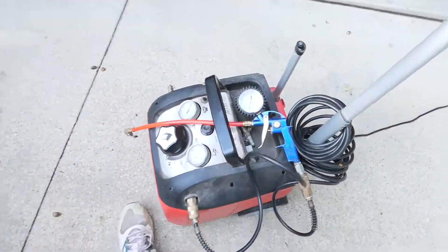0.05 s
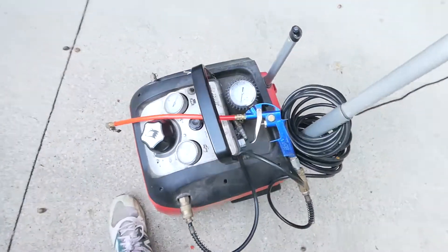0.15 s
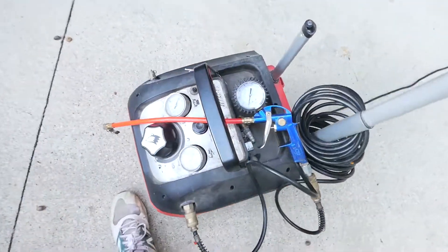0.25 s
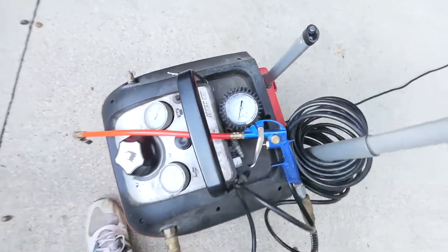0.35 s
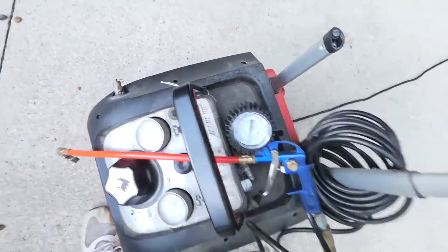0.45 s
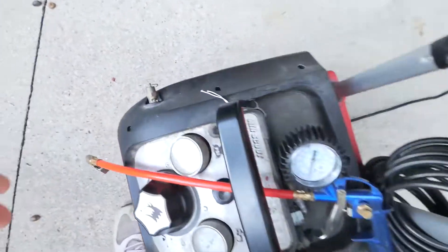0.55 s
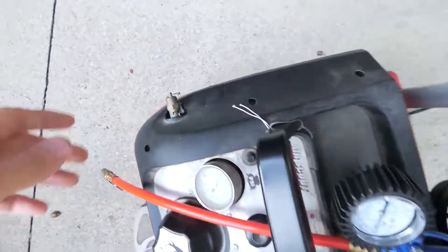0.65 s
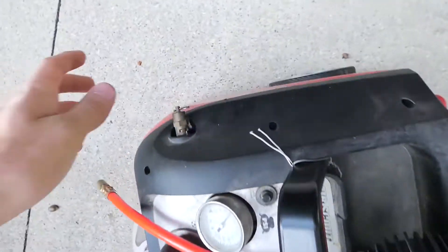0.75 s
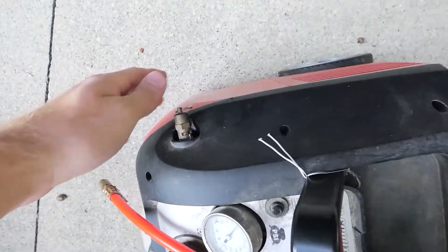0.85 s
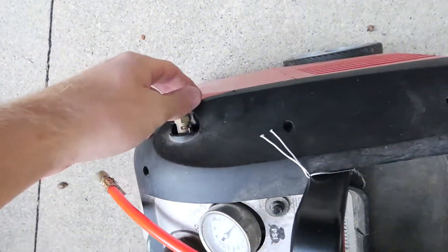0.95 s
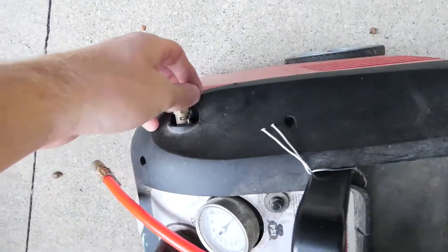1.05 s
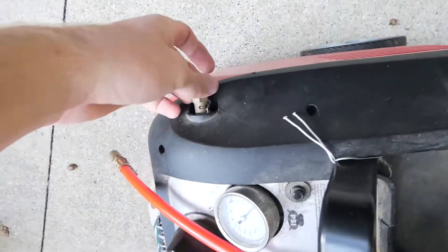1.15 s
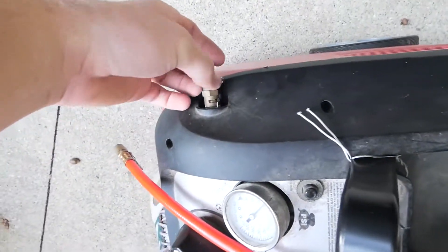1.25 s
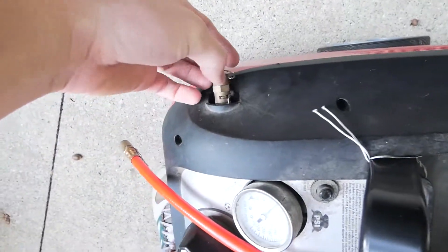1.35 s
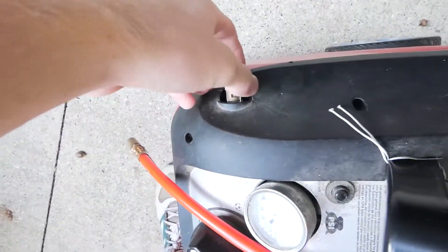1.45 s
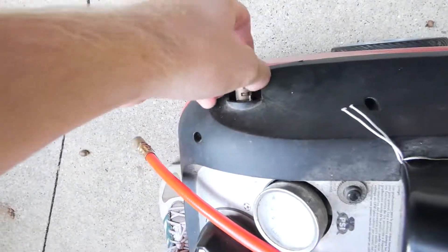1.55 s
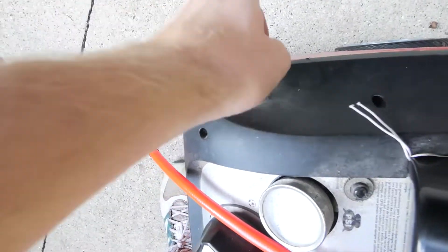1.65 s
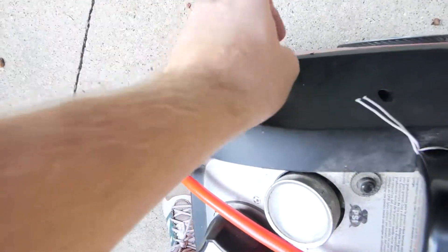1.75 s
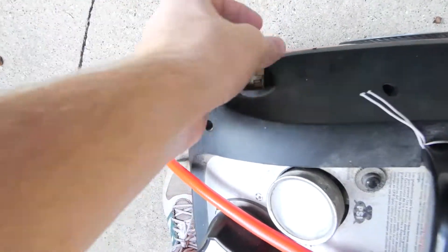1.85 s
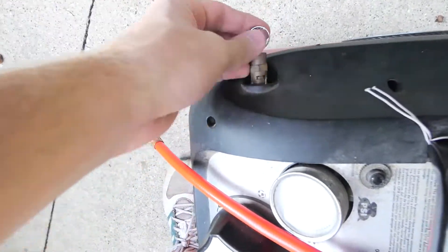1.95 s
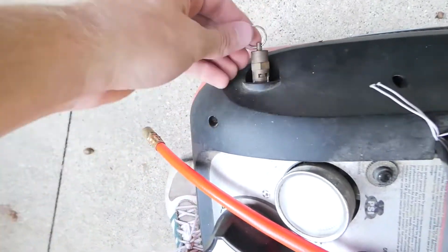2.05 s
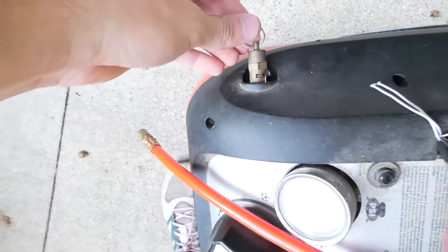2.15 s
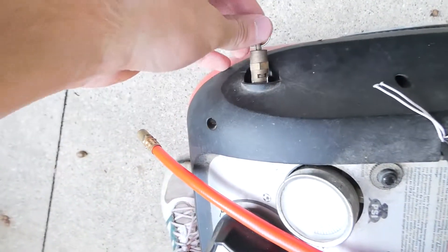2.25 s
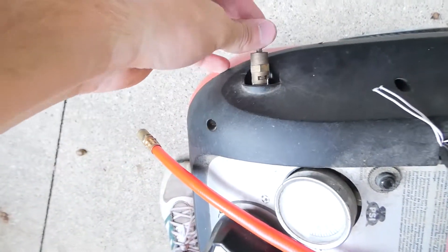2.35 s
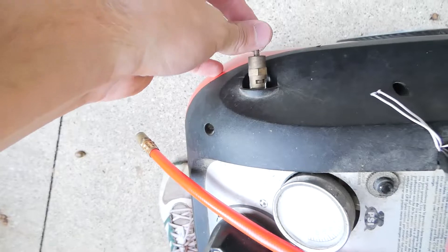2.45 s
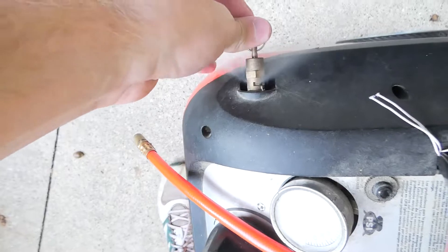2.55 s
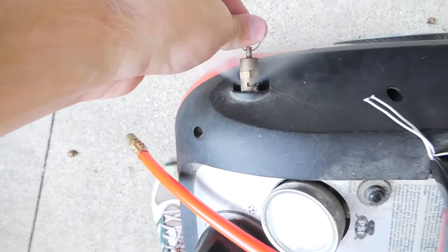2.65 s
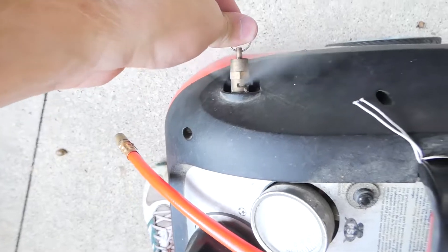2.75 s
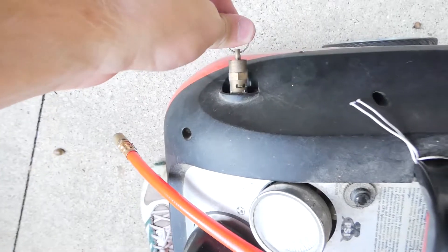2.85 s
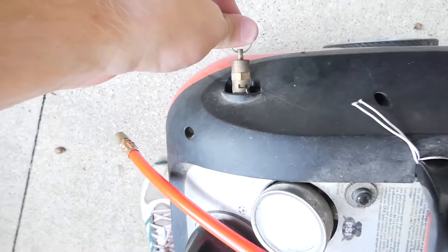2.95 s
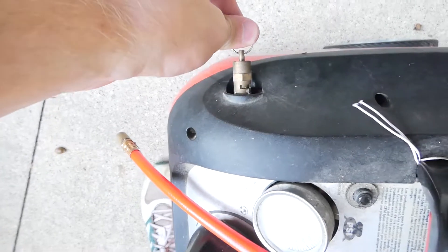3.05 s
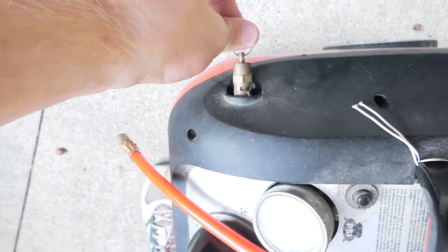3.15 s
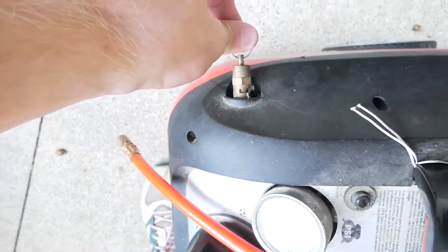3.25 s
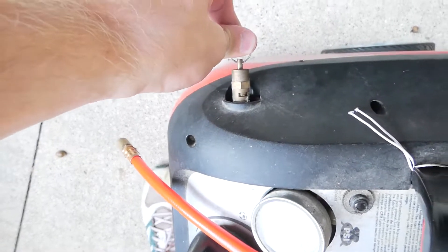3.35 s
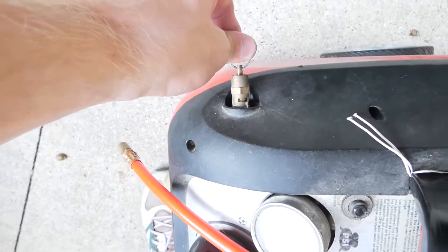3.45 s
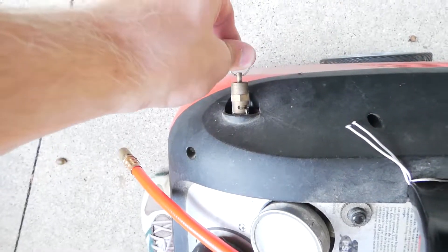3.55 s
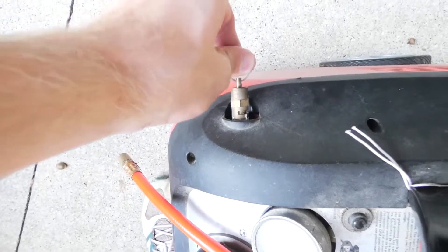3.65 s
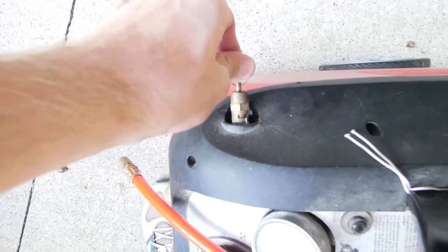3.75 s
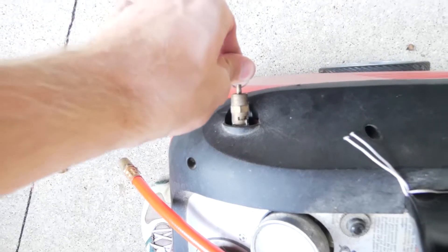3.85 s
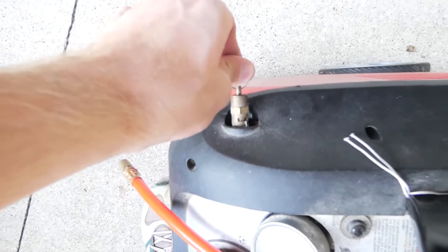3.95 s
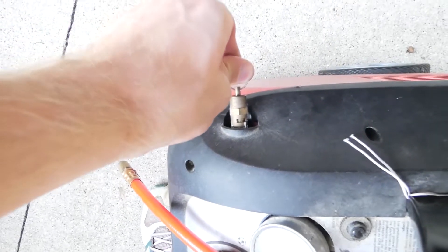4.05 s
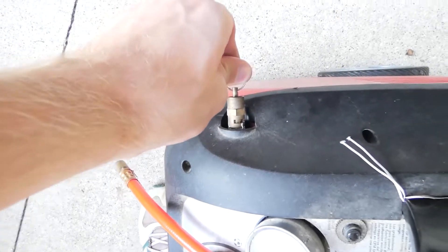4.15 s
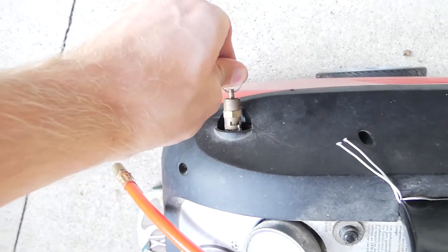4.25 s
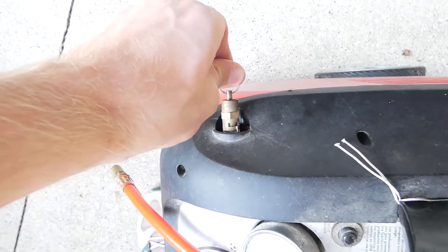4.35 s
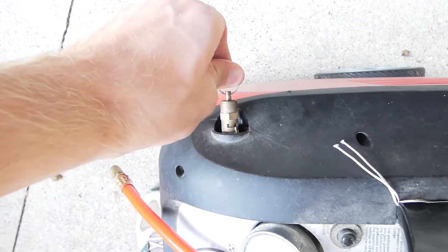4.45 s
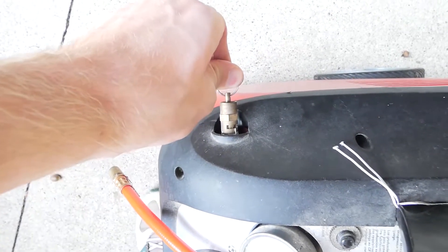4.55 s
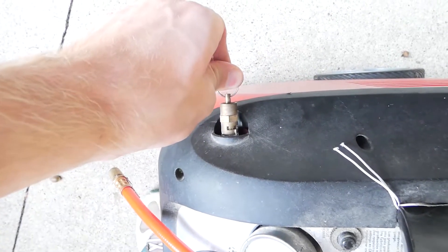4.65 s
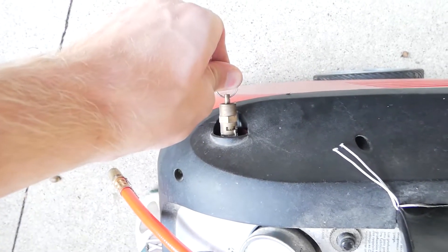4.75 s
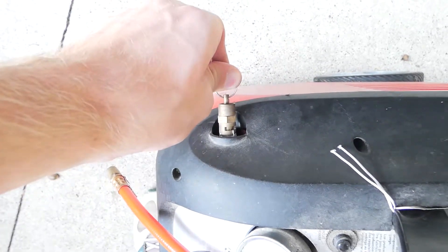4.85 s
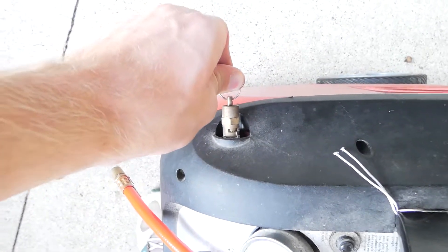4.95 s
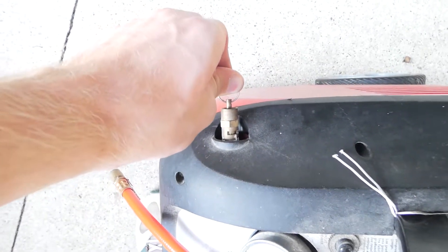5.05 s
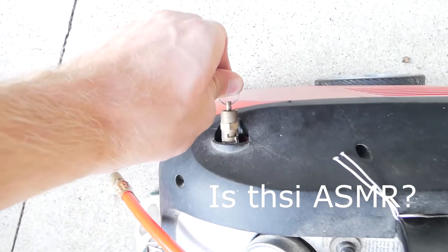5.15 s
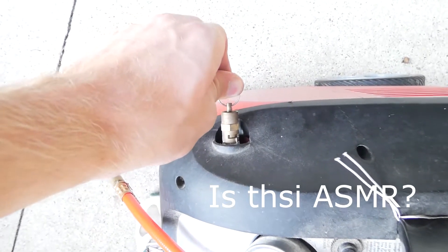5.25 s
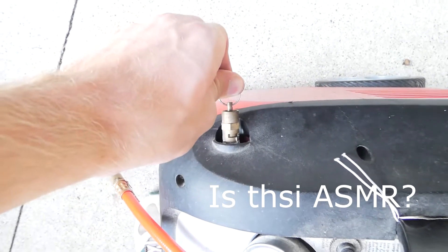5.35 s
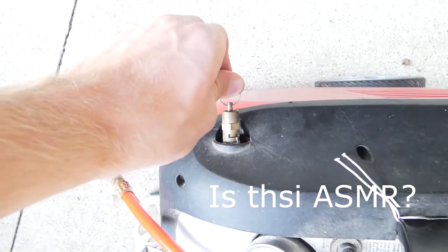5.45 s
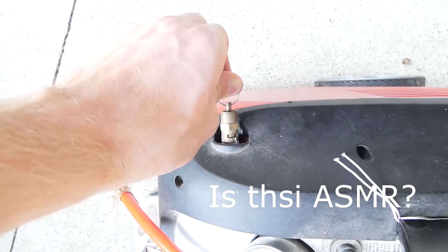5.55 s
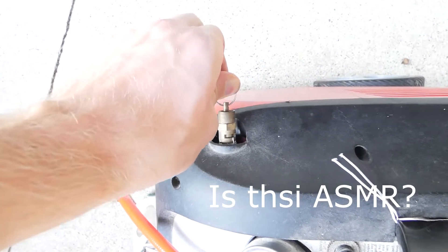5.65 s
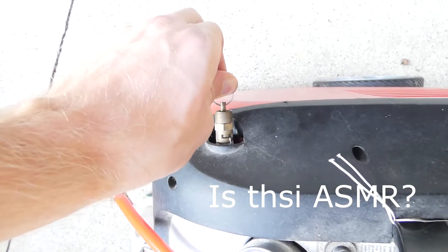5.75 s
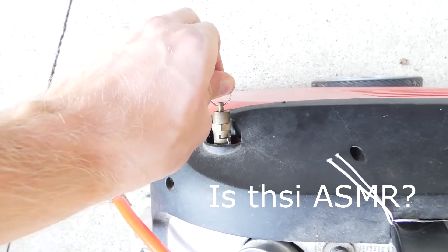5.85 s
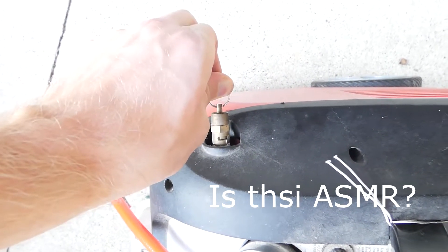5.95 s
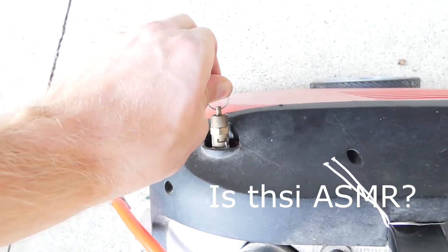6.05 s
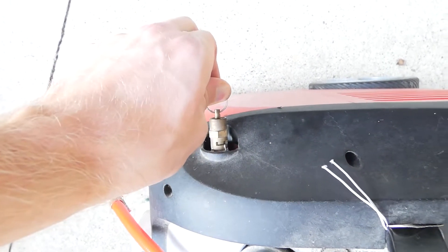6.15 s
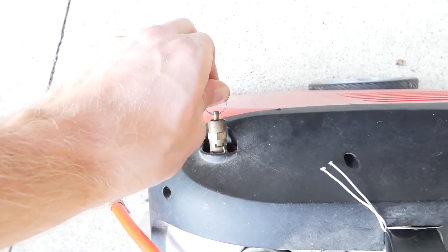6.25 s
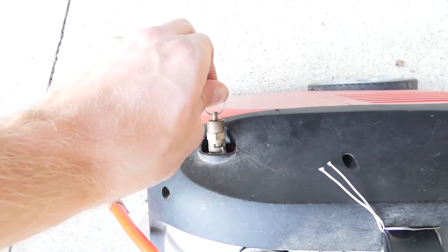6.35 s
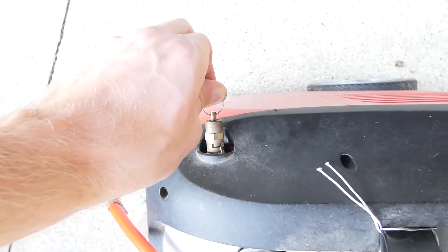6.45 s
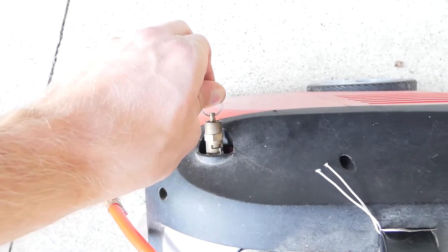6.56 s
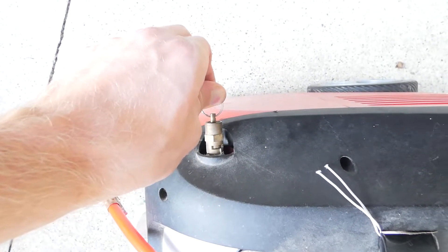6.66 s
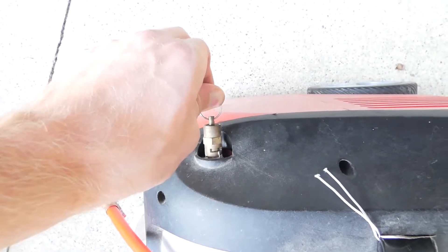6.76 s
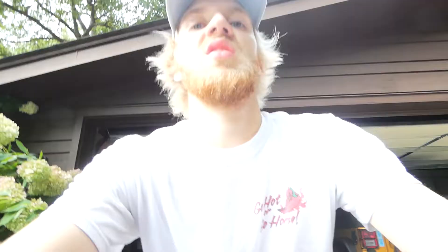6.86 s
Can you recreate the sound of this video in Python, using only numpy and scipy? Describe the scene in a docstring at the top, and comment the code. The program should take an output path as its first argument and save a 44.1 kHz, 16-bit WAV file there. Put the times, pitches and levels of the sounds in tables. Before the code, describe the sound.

Outdoors on concrete, shoes bump and scuff beside a switched-off air compressor, with faint insects and a distant hum behind. A hand knocks on the plastic housing and fiddles with a metal valve ring, making small clicks and skin squeaks. The safety valve then pops, and air rushes out close to the microphone, settling into a long hiss that dips twice and softens slightly at the end.

```python
"""A portable air compressor stands switched off on a concrete drive; insects trill over a far hum.
Someone steps up with bumps and gritty scuffs, knocks the plastic shroud and fingers the ring of the
safety valve, skin squeaking on it. At 2.55 s the ring is pulled: the valve pops and the tank blows
down in a long hiss whose colour sinks as the pressure falls. Near the end the pull slackens twice."""
import sys
import numpy as np
from scipy import signal
from scipy.fft import irfft
from scipy.io import wavfile
from scipy.ndimage import map_coordinates

SR = 44100
rng = np.random.default_rng(int(sys.argv[2]) if len(sys.argv) > 2 else 0)


def dump(signal):
    """Clip the signal to [-1, 1] and save it as 16-bit WAV at the path in sys.argv[1]."""
    limited = np.clip(np.atleast_2d(signal).T, -1, 1)
    pcm = np.round(limited * 32767).astype(np.int16)
    wavfile.write(sys.argv[1], SR, pcm)


N = 304731
TIME = np.arange(N) / SR
HZ = np.maximum(np.arange(N // 2 + 1) * SR / N, 1)
BEND_S, OPEN_S = 1.55, 2.5525   # listener has bent down; valve opens

# plastic shroud modes: (frequency [Hz], width [Hz], gain [dB])
SHROUD_MODES = [(588, 120, 14.5), (690, 77, 14), (953, 165, 11), (1220, 47, 0), (1280, 990, -2.5),
                (2030, 1400, -2.5), (2210, 52, 4), (3560, 1100, -3.5)]
# left-right likeness of the yard: (frequency [Hz], coherence [0..1])
YARD_COHERENCE = [(60, 0.48), (130, 0.2), (290, 0.48), (640, 0.15), (1410, 0.35), (3100, 0.5), (6820, 0.58),
                  (15000, 0.091)]


def from_db(db):
    """Decibels to gain."""
    return 10 ** (np.asarray(db) / 20)


def rms_one(x):
    """Scale to rms 1."""
    return x / np.sqrt(np.mean(x ** 2) + 1e-20)


def at_hz(points):
    """Table interpolated over log frequency."""
    hz, value = np.transpose(points)
    return np.interp(np.log(HZ), np.log(hz), value)


def panned(x, pan_db):
    """Pan by a level difference; positive is left."""
    gains = from_db(np.array([[.5], [-.5]]) * pan_db)
    return x * gains / gains.mean(axis=0)


def filtered(x, hz, kind="low", order=2):
    """Butterworth filter."""
    return signal.sosfilt(signal.butter(order, hz, kind, fs=SR, output="sos"), x)


def noise(spectrum, coherence):
    """Stereo noise of given spectrum and coherence; rms 1."""
    mid, side = rng.standard_normal((2, len(HZ))) + 1j * rng.standard_normal((2, len(HZ)))
    alike = np.clip(at_hz(coherence), 0, 1) ** .5
    both = np.sqrt(1 + alike) * mid + np.sqrt(1 - alike) * side * [[1], [-1]]
    return rms_one(irfft(both * from_db(at_hz(spectrum)), N))


def band(centre_hz, width_hz, apart, order=2):
    """Stereo noise band, rms 1; apart is the side/mid ratio."""
    white = rng.standard_normal((2, N)) + 1j * rng.standard_normal((2, N))
    mid, side = filtered(white, width_hz / 2, order=order)
    carrier = np.exp(2j * np.pi * centre_hz * TIME)
    return rms_one(((mid + apart * side * [[1], [-1]]) * carrier).real)


def resonate(x, hz, width_hz):
    """One resonance, peak gain 1."""
    r = np.exp(-np.pi * width_hz / SR)
    feedback = [1, -2 * r * np.cos(2 * np.pi * hz / SR), r * r]
    return signal.lfilter(np.array([1, 0, -1]) * (1 - r * r) / 2, feedback, x + 1e-18)


def body(x, modes):
    """Parallel modes with alternating signs."""
    return sum((-1) ** k * from_db(db) * resonate(x, hz, width_hz)
               for k, (hz, width_hz, db) in enumerate(modes))


def wander(position, points):
    """Straight lines between Gaussian points; holds after the last."""
    return np.interp(position, np.arange(points), rng.standard_normal(points))


def flutter(per_s, depth_db):
    """Randomly wandering gain."""
    return from_db(depth_db * wander(TIME * per_s, 4000))


def ramp(start_s, length_s):
    """Linear 0 to 1, then holds."""
    return np.clip((TIME - start_s) / length_s, 0, 1)


def arches(rows):
    """Half-sine gain per (start [s], length [s], level [dB])."""
    return sum(from_db(db) * np.sin(np.pi * ramp(s, length_s)) for s, length_s, db in rows)


def swell(t, length_s):
    """Quick rise, slower fall; peaks at 1 near a third of its length."""
    u = np.pi * t / length_s
    return u ** 2 * np.exp(2 * (1 - u))


def add(out, start_s, sound):
    """Mix in a short stereo sound."""
    i = round(start_s * SR)
    out[:, i:i + sound.shape[1]] += sound[:, :N - i]


def yard(level_db=-40, hum_hz=202.5, sizzle_db=-47, sink_db=-16, sink_db_per_s=-20):
    """Open-air murk, far wavering hum, high sizzle and insects; all sink once the jet starts."""
    # background spectra: (frequency [Hz], relative density [dB])
    murk_spectrum = [(25, -54), (50, -20), (110, -5.5), (170, -3), (280, -3), (600, -4), (1200, -7),
                     (1800, -11), (2400, -4.5), (3200, -13), (4100, -14), (5000, -12), (6500, -15),
                     (7800, -18.5), (9500, -16), (12500, -27), (16000, -30)]
    sizzle_spectrum = [(5800, -21), (6700, 3), (7700, -17), (9000, -5), (10200, -5), (12000, -9),
                       (14000, -9), (16000, -19)]
    murk = noise(murk_spectrum, YARD_COHERENCE) * flutter(per_s=5.3, depth_db=-0.14)
    murk *= from_db(-.6 * (TIME - BEND_S))   # quieter near the ground
    tone = rms_one(np.sin(2 * np.pi * hum_hz * TIME) + 1.2 * band(hum_hz, width_hz=18.4, apart=0.28))
    hum = from_db(-9.5) * tone + from_db(-11) * band(135, width_hz=69, apart=.2)
    sizzle = noise(sizzle_spectrum, YARD_COHERENCE) * from_db(sizzle_db - 11.5 * ramp(0.58, .05))
    sink = from_db(sink_db * ramp(OPEN_S, 0.13) + sink_db_per_s * np.maximum(TIME - OPEN_S, 0))
    return sink * (from_db(level_db) * (murk + panned(hum, 3.3)) + sizzle + insects())


def insects(level_db=-42.5, start_pan_db=-4.0, turn_db_per_s=-6.5):
    """Steady trill with a few swells; moves right as the listener turns."""
    # trill swells: (start [s], length [s], level [dB])
    swells = [(.8, 0.2, -44), (1.22, 0.26, -41), (1.7, 0.2, -41), (2.338, 0.017, -31.5)]
    chorus = rms_one(band(2525, width_hz=108, apart=0.15) + 0.6 * band(2490, width_hz=740, apart=.3))
    level = np.hypot(from_db(level_db) * flutter(per_s=8.4, depth_db=-2.0), arches(swells))
    return panned(chorus * level, start_pan_db + turn_db_per_s * TIME)


def knock(db, hz, q, shroud_db, tick_db, rattle_db,
          contact_s=0.0016, bounce_s=.003, rattle_t60_s=0.051, tail_t60_s=0.13):
    """Click, rebound and dying rattle drive a damped mode and the shroud; brass takes mostly the click."""
    # brass valve and ring modes: (frequency [Hz], width [Hz], gain [dB])
    brass_modes = [(3400, 190, 6), (4680, 2940, 6), (6200, 1400, 9), (9550, 2400, -4.5)]
    t = np.arange(SR // 5) / SR
    grains = rng.standard_normal((3, len(t))) / np.sqrt(len(t))
    rattle = from_db(rattle_db) * grains[0] * rms_one(from_db(-60 * t / rattle_t60_s) * (t > contact_s))
    rattle = rattle + from_db(-16) * grains[1:] * rms_one(from_db(-60 * t / tail_t60_s))
    click = np.zeros(len(t))
    click[0], click[round(bounce_s * SR)] = 1, 0.062
    force = click + rattle
    mode = rms_one(resonate(resonate(force, hz, hz / q), hz, 2 * hz))
    shroud = rms_one(resonate(body(force, SHROUD_MODES), 910, 4300))
    tick = rms_one(resonate(body(click + 0.35 * rattle, brass_modes), 3300, 7700))
    sound = rms_one(mode + from_db(shroud_db) * shroud + from_db(tick_db + 3.5) * tick)
    # low or rattling knocks stay near their peak longer
    loud_s = 0.00059 * (900 / hz) * (1 + from_db(rattle_db))
    sound *= np.sqrt(loud_s / t[-1]) * from_db(db - 3.5)
    return np.pad(sound, ((0, 0), (round(contact_s * SR), 0)))


def steps():
    """Shoes bump dully beside the compressor."""
    # shoe bumps: (time [s], level [dB], mode [Hz], pan [dB], shroud [dB])
    bumps = [(0.039, -19.5, 395, 2, -2.5), (0.109, -20.5, 510, 16, -7), (0.154, -4.5, 475, 11, -11.5),
             (0.275, -19, 437, 12, -9), (0.509, -18.5, 640, -2, -9)]
    out = np.zeros((2, N))
    for s, db, hz, pan_db, shroud_db in bumps:
        bump = knock(db, hz, q=5.2, shroud_db=shroud_db, tick_db=-28, rattle_db=-6)
        add(out, s, panned(bump, pan_db))
    return out


def shuffling(scrape_db=-11):
    """Soles scuff on grit; the reaching arm rubs dully with a light scrape."""
    # grit spectrum: (frequency [Hz], relative density [dB])
    grit_spectrum = [(350, -26), (600, 7.5), (1400, 5.5), (1990, 2), (2470, 2), (6000, 0), (8070, -10),
                     (11500, -8), (15000, -23)]
    # strokes of sole and arm: (start [s], length [s], level [dB])
    sole_strokes = [(0.099, 0.081, -37), (0.274, 0.1, -34), (0.496, 0.18, -34), (0.645, 0.25, -43.5),
                    (0.959, 0.12, -37), (1.127, 0.04, -33.5), (1.492, 0.06, -36), (1.612, 0.071, -43),
                    (2.022, 0.07, -39.5)]
    arm_strokes = [(.56, 0.47, -39), (1.12, 0.31, -45), (1.5, .17, -42), (1.73, 0.11, -39.5),
                   (1.89, 0.048, -42)]
    grit = noise(grit_spectrum, YARD_COHERENCE) * flutter(per_s=820, depth_db=2.5)
    scuffs = sum(from_db(db) * swell(np.maximum(TIME - s, 0), length_s)
                 for s, length_s, db in sole_strokes)
    rub = band(480, width_hz=120, apart=0.32) + from_db(scrape_db) * band(3450, width_hz=390, apart=0.36)
    return panned(grit * scuffs, -0.5) + rub * arches(arm_strokes)


def hand_pan_db(s, start_db=9, end_db=-6):
    """Handling moves left to right as the listener bends down, then stays."""
    return start_db + (end_db - start_db) * np.clip(s / BEND_S, 0, 1)


def knocks():
    """Hard knocks on shroud and valve ring clack cleanly; lighter ones rattle more."""
    # hand contacts: (time [s], level [dB], mode [Hz], brass tick [dB])
    contacts = [(0.529, -11, 1090, -14), (0.534, -1, 800, -7), (0.547, -19, 1130, -6), (0.99, -7, 776, -15),
                (1.027, -1.5, 1110, -2), (1.137, -16, 790, -6), (1.404, -21, 571, -11),
                (1.551, -22, 929, -3), (1.562, -15.5, 600, -5), (1.659, -29, 1010, 0),
                (2.035, -17.5, 940, -8), (2.094, -21.5, 1160, -6), (2.397, -35, 1300, -8),
                (2.446, -37, 1300, 2)]
    out = np.zeros((2, N))
    for s, db, hz, tick_db in contacts:
        clack = knock(db, hz, q=4.9, shroud_db=1.0, tick_db=tick_db, rattle_db=-9 - 0.92 * db)
        add(out, s, panned(clack, hand_pan_db(s)))
    return out


def slips(gain_db=-8, length_s=0.024, waver=.09, catches_per_s=600, catch_db=4):
    """Skin sticks and slips on the valve: unsteady squeak plus friction noise in the shroud."""
    # fingertip slips: (time [s], relative level [dB], squeak [Hz], friction re squeak [dB])
    touches = [(1.079, -21, 960, -5), (1.309, -18, 507, -2), (1.372, -27.5, 646, 9), (1.489, -11, 1470, -3),
               (1.52, -21, 740, 0), (1.593, -18.5, 746, 3), (1.64, -23.5, 2050, 1), (1.742, -23, 696, 19)]
    out, t = np.zeros((2, N)), np.arange(SR // 10) / SR
    for s, db, hz, friction_db in touches:
        rate_hz = hz * (1 + waver * wander(t * hz, 300))   # varies cycle to cycle
        squeak = np.sqrt(2) * np.sin(2 * np.pi * np.cumsum(rate_hz) / SR)
        grip = from_db(catch_db * wander(t * catches_per_s, 300))
        friction = rms_one(resonate(body(grip * rng.standard_normal(len(t)), SHROUD_MODES), hz, 1.2 * hz))
        slip = rms_one(squeak + from_db(friction_db) * friction) * swell(t, length_s)
        add(out, s, panned(slip * from_db(db + gain_db), hand_pan_db(s)))
    return out


def pop(peak_db=-4, boom_hz=(125, 450), slap_db=-6):
    """The first puff of air thumps as the valve leaves its seat."""
    puff = np.zeros(N)
    puff[round((OPEN_S - .0003) * SR)] = 1
    boom = filtered(puff, boom_hz, "band")
    slap = resonate(body(puff, SHROUD_MODES[2:]), 960, 3400)
    thump = rms_one(boom) + from_db(slap_db) * rms_one(slap)
    return from_db(peak_db) * thump / np.abs(thump).max()


def jet(rumble_fall_db_per_s=5.5, top_fall_db_per_s=0.7, ease_hiss_db=-4.0, ease_roar_db=-2.0,
        lead_in_s=0.0035):
    """One flow drives rumble, roar and hiss; as the tank empties, rumble dies and roar gains on hiss."""
    # jet spectra: (frequency [Hz], relative density [dB])
    rumble_spectrum = [(25, -42), (50, -8), (85, 2), (140, -2.5), (300, -1.5), (600, -4.5), (1200, -26.5)]
    roar_spectrum = [(88, -54), (150, -19), (335, -14), (560, -9), (593, -10), (694, -5.5), (825, -9.5),
                     (925, -3.5), (1180, -8), (2150, -5.5), (2520, -5), (3310, -5.5), (4600, -5.5),
                     (5980, -51), (10100, -120)]
    hiss_spectrum = [(4300, -32), (4750, -6.5), (5300, -3.5), (7000, -1.5), (8800, -1), (9800, -1.5),
                     (11000, -2), (12500, -8), (16000, -19)]
    top_spectrum = [(9000, -31.5), (11500, -2), (13500, 0), (15300, -1), (15900, -13)]
    # left-right likeness of the jet: (frequency [Hz], coherence [0..1])
    coherence = [(60, 0.073), (130, 0.046), (290, 0.052), (640, 0.36), (1410, 0.4), (3100, 0.62),
                 (6820, 0.83), (15000, 0.67)]
    since_s = np.maximum(TIME - OPEN_S, 0)
    opened = ramp(OPEN_S, 0.00069)
    # a faint hiss fades in a few milliseconds before the pop
    lead_in = from_db(-6) * ramp(OPEN_S - lead_in_s, lead_in_s) * (1 - opened)
    eased = ramp(6.651, .0044) + .5 * ramp(6.853, 0.0033)   # pull slackens: gap narrows in two steps
    rumble = noise(rumble_spectrum, coherence) * flutter(per_s=11, depth_db=2.0)
    rumble *= from_db(-12.5 - rumble_fall_db_per_s * since_s)
    roar_db = -9 + 2.5 * ramp(3.97, 1) + ease_roar_db * eased
    roar = (noise(roar_spectrum, coherence) + rumble) * from_db(roar_db)
    top = from_db(-6.0 - top_fall_db_per_s * since_s) * noise(top_spectrum, coherence)
    hiss = from_db(-1.0) * noise(hiss_spectrum, coherence) + top + jet_bands(eased)
    hiss *= from_db(ease_hiss_db * eased)
    air = flow_gain() * (panned(roar, -1.0) * opened + hiss * (opened + lead_in))
    return reflected(hollowed(filtered(air, 60, "high")))


def flow_gain(held_db=-29.0, rush_db=8.5, rush_s=1.11):
    """The first rush settles to a steady flow, briefly throttled as the grip shifts."""
    # grip shifts: (start [s], length [s], lost share of flow [dB])
    grip_shifts = [(3.45, 0.36, -21), (3.98, .4, -20.5)]
    rush = np.cos(np.pi / 2 * ramp(OPEN_S, rush_s)) ** 1.9
    return from_db(held_db + rush_db * rush) * (1 - arches(grip_shifts))


def jet_bands(eased):
    """Each noise band swells and fades as the tank passes the pressure that favours it."""
    # jet bands: (centre [Hz], width [Hz], peak time [s], spread [s], level re flow [dB], easing [dB])
    bands = [(9970, 1300, 3.2, 0.66, -6, -1), (10680, 2000, 4.6, 0.58, -7, 0),
             (8100, 2900, 6.14, 1.2, -9, -15), (6230, 1020, 7, 1.24, -6, 0),
             (3370, 450, 4.34, 0.91, -19, 0), (10240, 1100, 6.9, 0.54, -11, 1.5),
             (4910, 990, 3.2, 0.78, -17, 0)]
    out = 0
    for hz, width_hz, peak_s, spread_s, db, ease_db in bands:
        favour = np.exp(-.5 * ((TIME - peak_s) / spread_s) ** 2) * from_db(db + ease_db * eased)
        out = out + favour * band(hz, width_hz, apart=0.27, order=4) * flutter(per_s=15, depth_db=1.7)
    return out


def hollowed(x, start_hz=4000, rise_hz_per_s=165, wander_hz=110, width_hz=480, depth=0.33):
    """A shallow notch between roar and hiss wanders with the hand and rises as the tank empties."""
    hz = start_hz + rise_hz_per_s * (TIME - OPEN_S) + wander_hz * wander(TIME * 2, 20)
    carrier = np.exp(2j * np.pi * np.cumsum(hz) / SR)
    inside = filtered(x / carrier, width_hz / 2, order=1)
    return x - depth * 2 * (inside * carrier).real


def reflected(x, sway_ms=0.011, scatter_db=-12, scatter_t60_s=0.023, shifts_per_s=2.01):
    """Near surfaces comb the jet; paths sway with the hand and the fine scatter keeps shifting."""
    # echoes off hand, shroud and ground: (delay [ms], gain [ratio])
    echoes = [(1.121, -0.0081), (2.06, -0.021), (3.25, -0.016), (4.2, -0.0032), (5.6, 0.043)]
    out = x.copy()
    for delay_ms, gain in echoes:
        read_s = TIME - (delay_ms + sway_ms * wander(TIME, 8)) / 1000
        out += gain * np.array([map_coordinates(side, [read_s * SR], order=3) for side in x])
    t = np.arange(SR // 40) / SR
    treble = filtered(x, 1200, "high")
    for k in range(10):
        paths = rng.standard_normal(len(t)) * from_db(-60 * t / scatter_t60_s) * (t > .002)
        scatter = signal.oaconvolve(treble, paths[None] / np.linalg.norm(paths), axes=1)[:, :N]
        crossfade = np.sqrt(np.clip(1 - np.abs((TIME - OPEN_S) * shifts_per_s - k), 0, 1))
        out += from_db(scatter_db) * crossfade * scatter
    return out / np.sqrt(1 + from_db(scatter_db) ** 2)


def scene():
    """All sources, heard from just above the compressor."""
    return yard() + shuffling() + steps() + knocks() + slips() + pop() + jet()


def record(dry, cutoff_hz=15750):
    """Clip at full scale, then low-pass steeply."""
    lowpass = signal.ellip(12, .1, 80, cutoff_hz, fs=SR, output="sos")
    return signal.sosfilt(lowpass, np.clip(dry, -1, 1))


dry = scene()
out = record(dry)
dump(out)
```